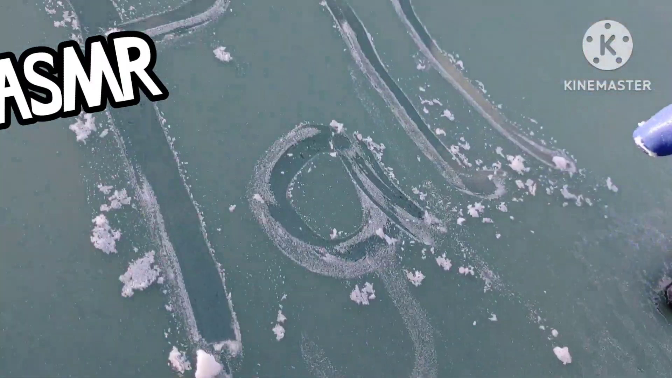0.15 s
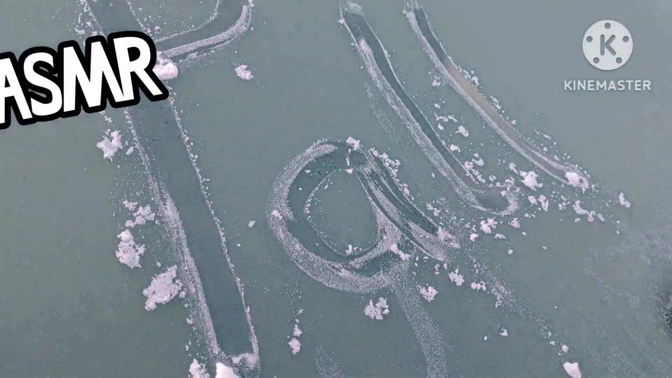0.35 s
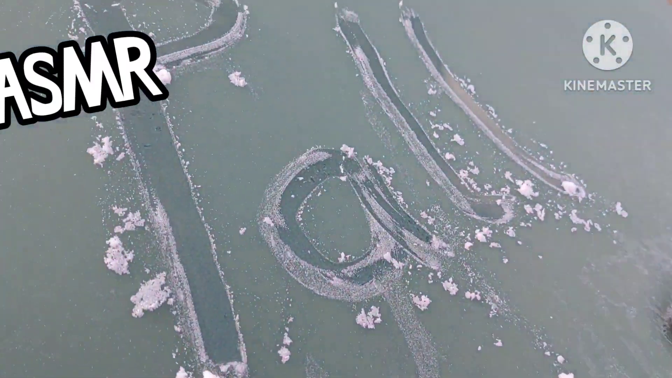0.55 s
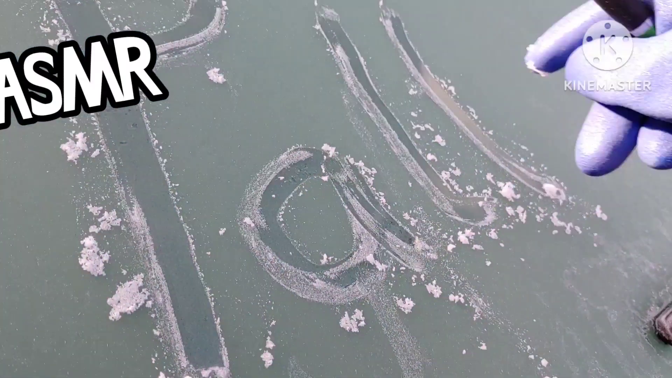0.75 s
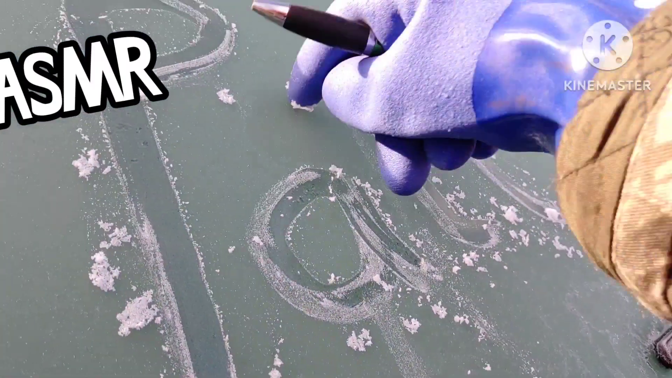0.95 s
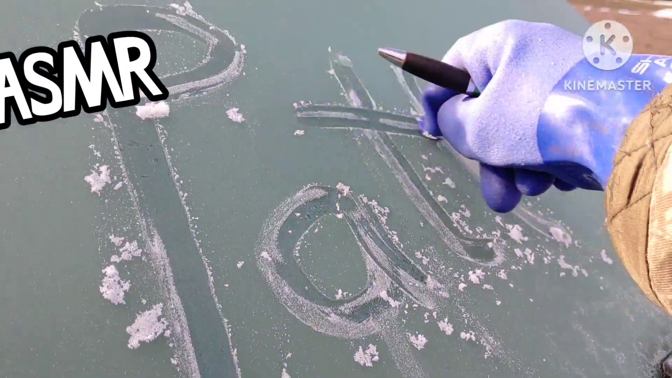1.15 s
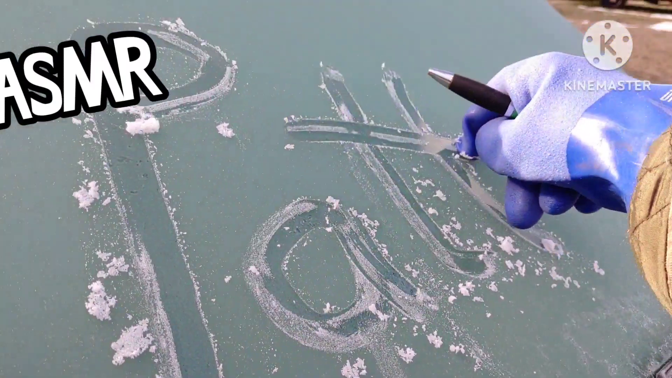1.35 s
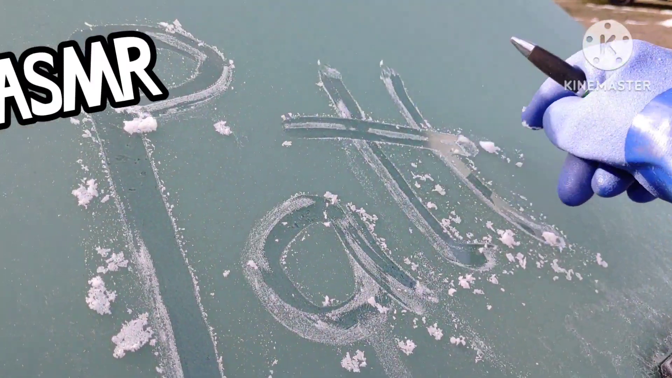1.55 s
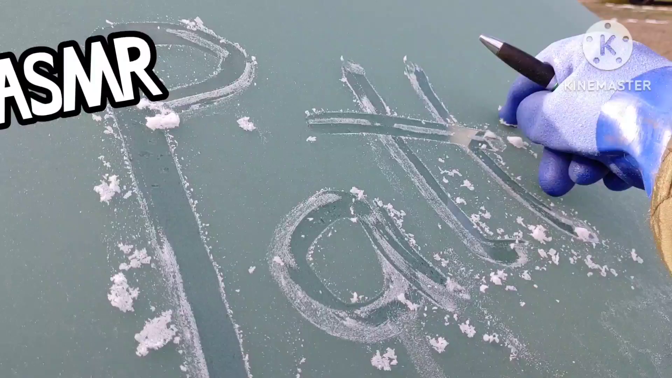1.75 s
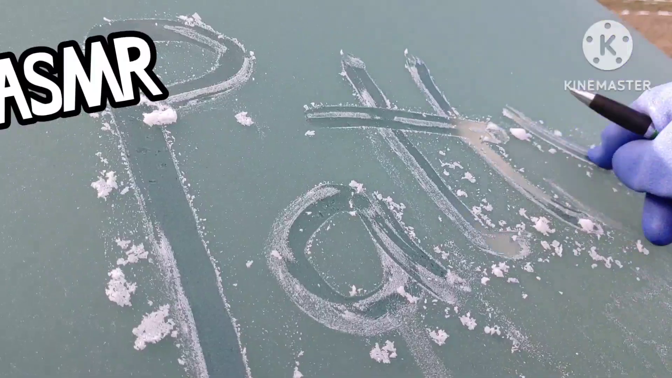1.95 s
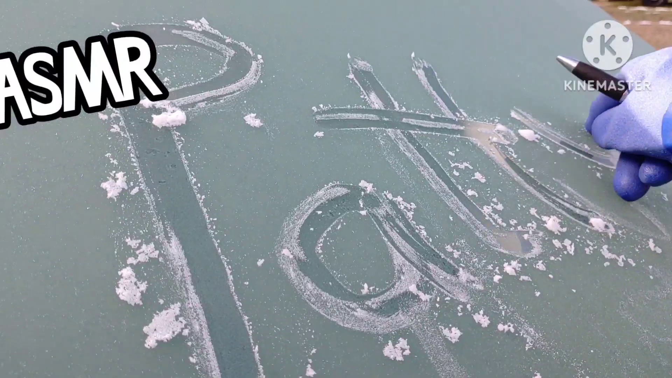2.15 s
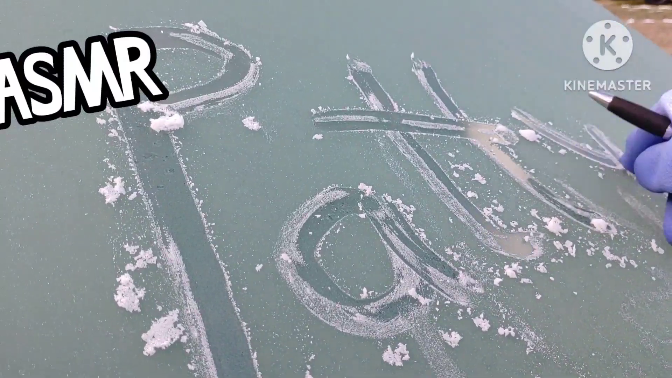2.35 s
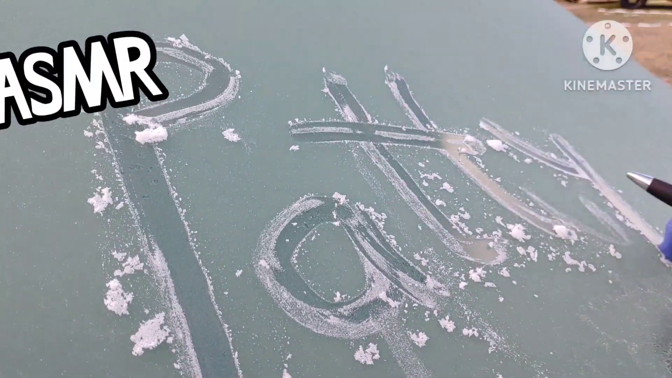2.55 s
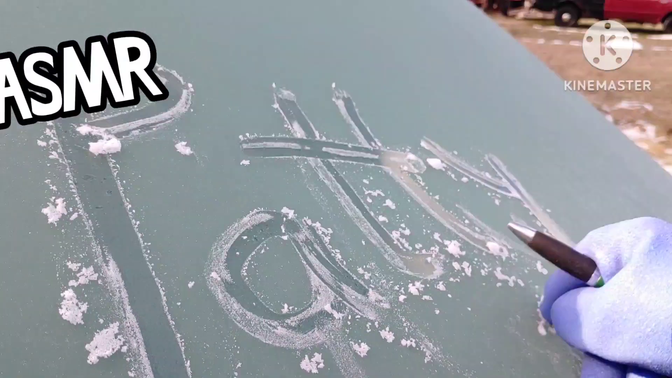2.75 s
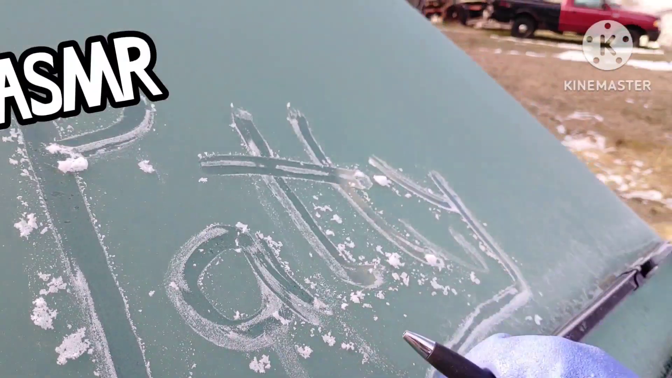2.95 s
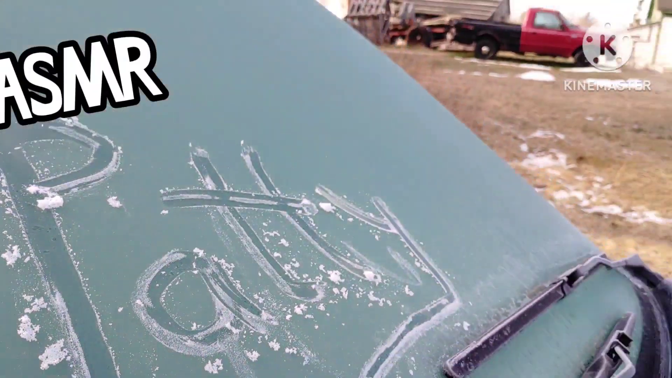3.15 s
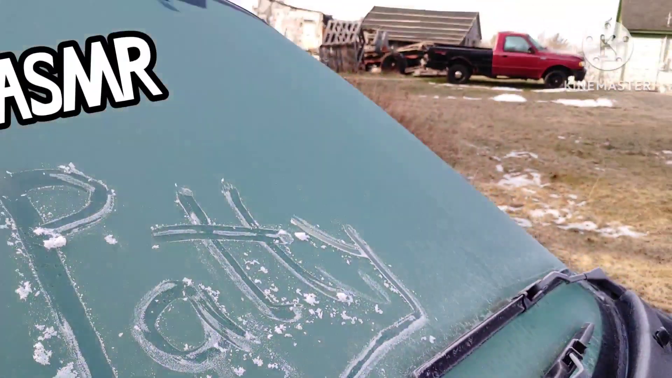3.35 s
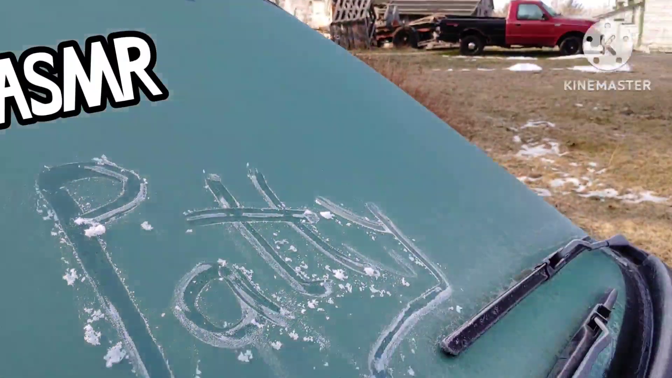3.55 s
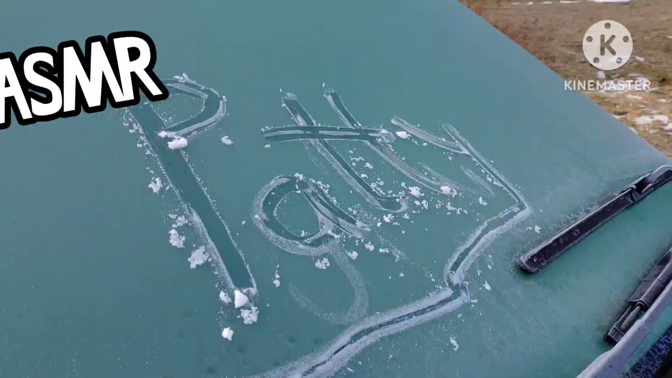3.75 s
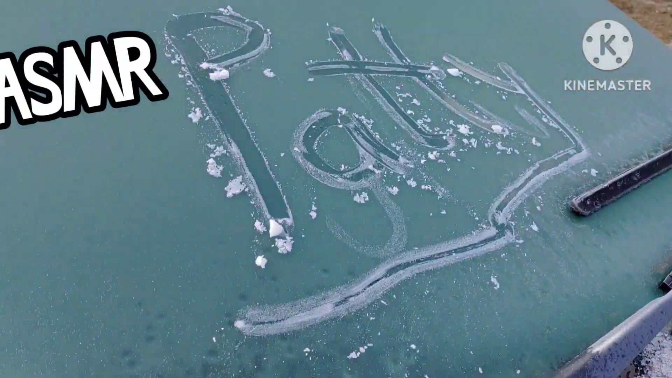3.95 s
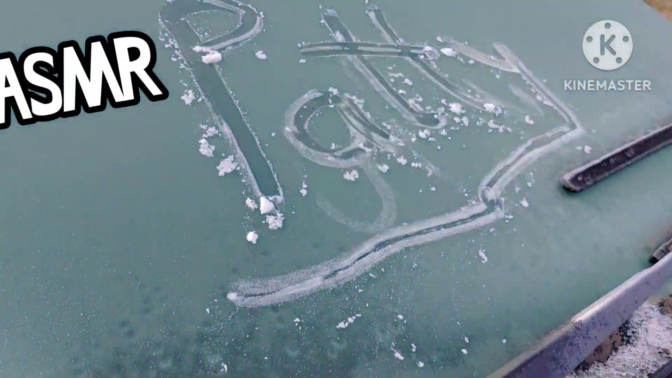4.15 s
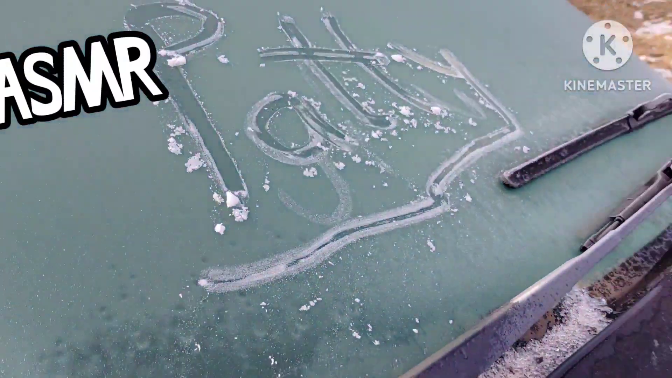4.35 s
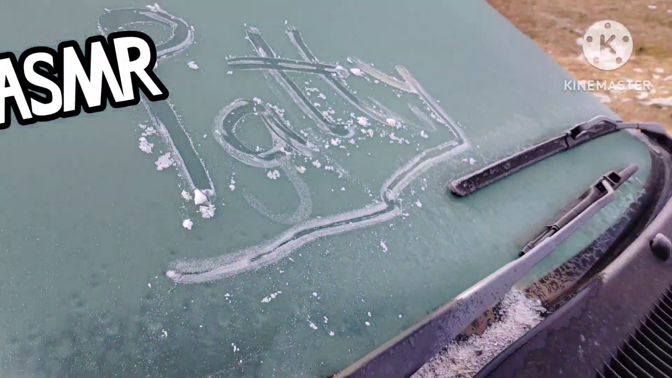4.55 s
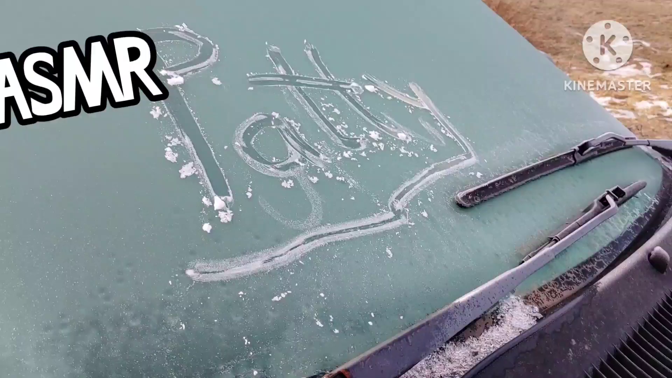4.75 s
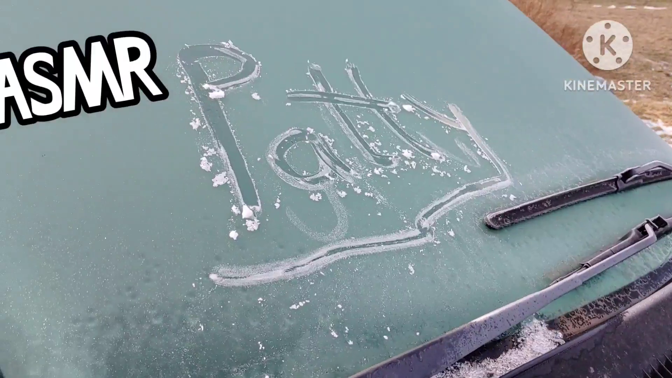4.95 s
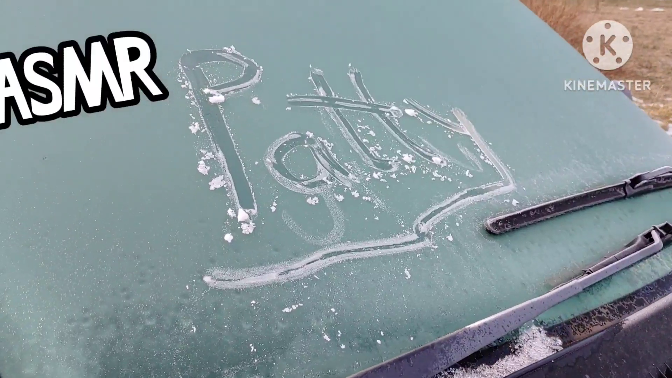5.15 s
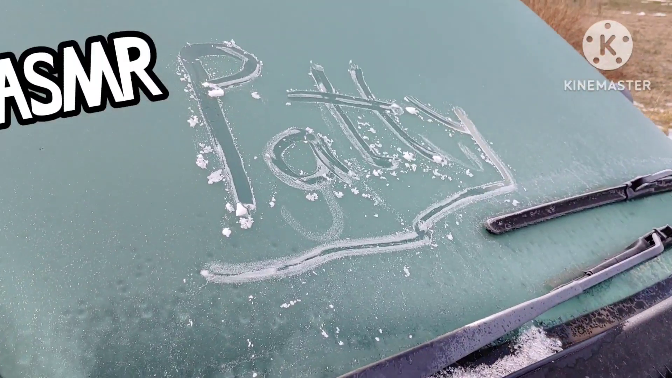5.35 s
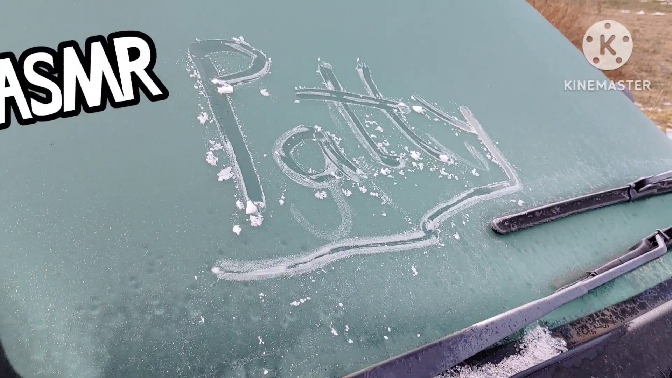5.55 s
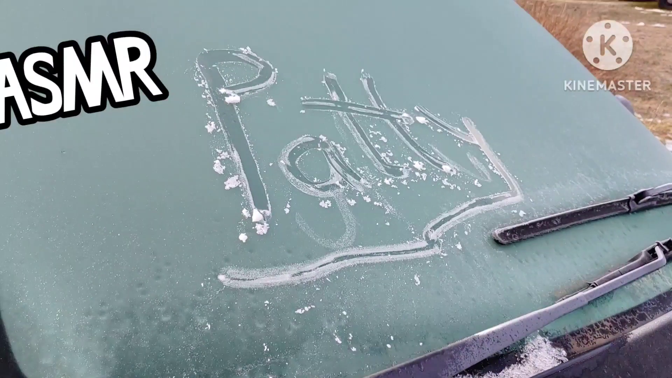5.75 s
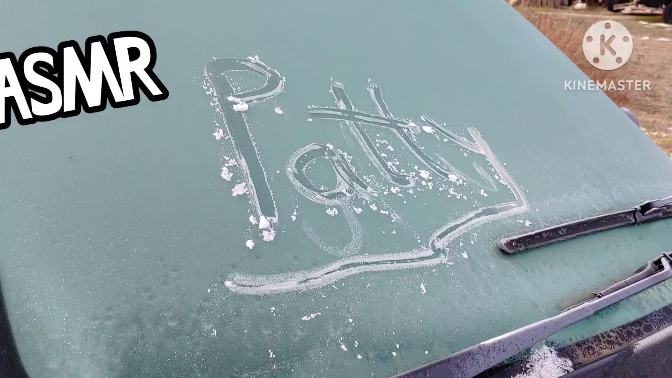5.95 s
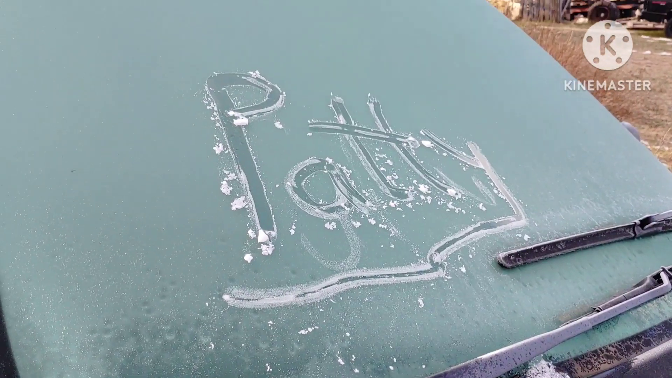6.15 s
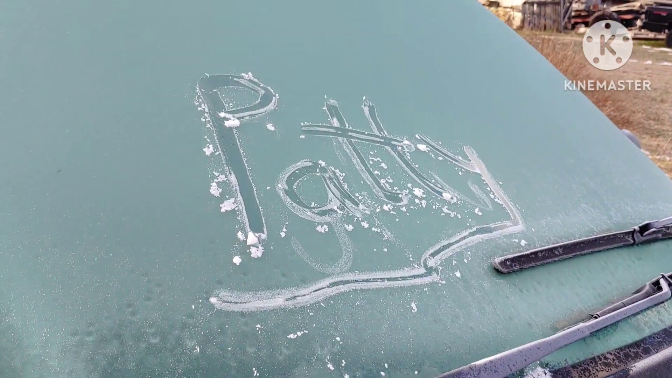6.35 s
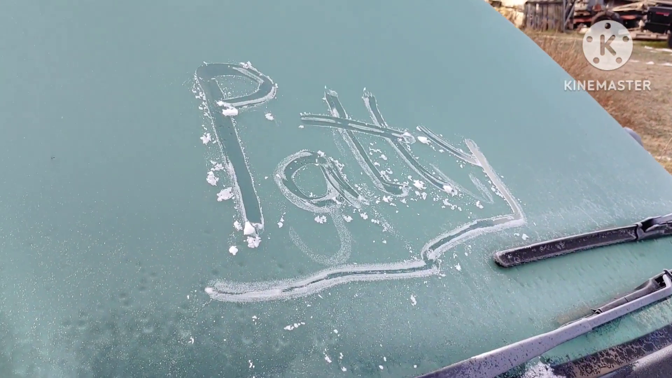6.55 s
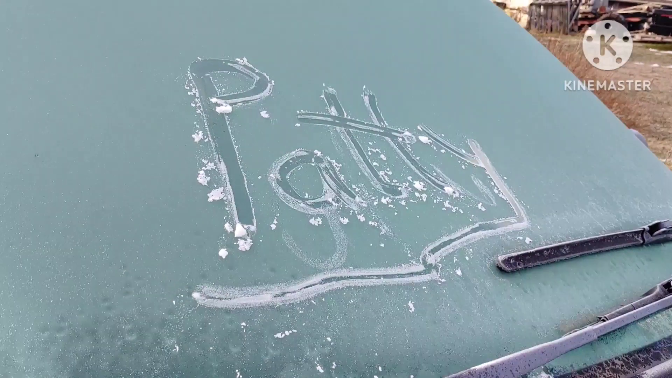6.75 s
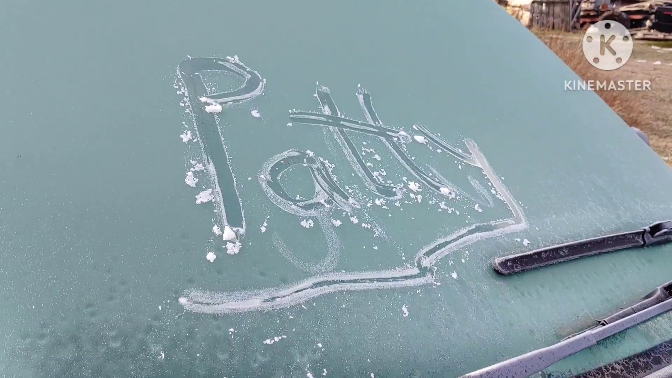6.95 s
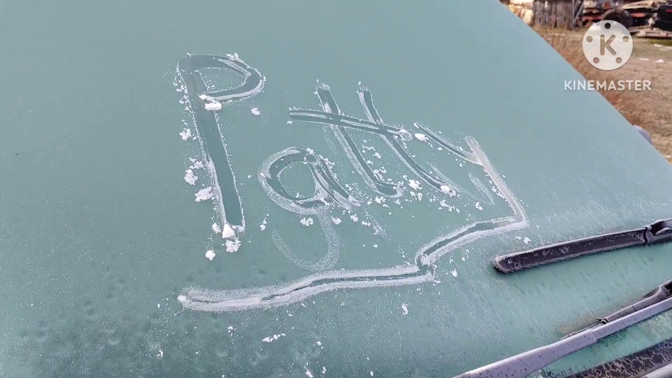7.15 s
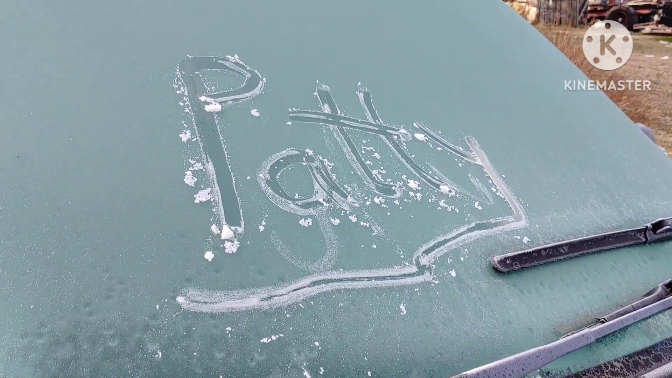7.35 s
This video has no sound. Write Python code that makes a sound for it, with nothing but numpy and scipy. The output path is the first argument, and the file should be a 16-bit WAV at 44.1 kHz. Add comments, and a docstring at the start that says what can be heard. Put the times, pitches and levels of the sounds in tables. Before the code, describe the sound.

A close, hand-held stereo phone outdoors, with faint microphone hiss and quiet distant air. From 0 to 0.9 seconds light wind buffets the microphones in low thumps, with soft handling bumps and small bright ticks. Around 0.9 to 1.1 a pen makes two short, crunchy scrapes through frost, with a slight glove squeak. Wind pops fill the gap around 1.35. From 1.65 to 3.35 quick overlapping strokes hiss and crackle, grainy and bright with a glassy ring, swelling and fading with the pen's speed, strongest near 2.6 to 3.3. A tiny scratch comes at 3.7. Sleeve cloth rustles softly; small pen clicks sound at 4.2 and 4.4, then a dense cluster of dull knocks and rubs on the phone around 4.6 to 4.75. Fainter knocks and a light click come near 5.1. Calm air with weak breeze follows, then muffled bumps around 6.6, ending quietly by about 7.4.

```python
"""Frost scraped from glass

A pen scrapes quick strokes through the frost on a windshield outdoors, close to a hand-held phone.
Dense random snaps, coloured by the frost and the glass, form the hiss of breaking ice crystals.
Low-frequency noise and brief pressure pulses form the light wind that buffets the two microphone ports.
Around and after the strokes a sleeve rustles (brushed grains) and the phone is bumped and rubbed
(blows and grains pass through its case); later the pen clicks (a cracked barrel rings)."""
import sys
import numpy as np
from scipy import signal
from scipy.fft import rfft, irfft
from scipy.io import wavfile
from scipy.ndimage import uniform_filter1d, map_coordinates

SR = 44100
rng = np.random.default_rng(int(sys.argv[2]) if len(sys.argv) > 2 else 0)


def pcm_store(signal):
    """Save signal as 16-bit PCM."""
    levels = np.round(np.clip(np.atleast_2d(signal), -1, 1) * 32767)
    wavfile.write(sys.argv[1], SR, levels.astype(np.int16).T)


N = 329762
TIME = np.arange(N) / SR

# All levels in the tables are relative: each source applies its own gain afterwards.
# Noise of the microphones: [f/Hz, level/dB]
HISS_SPECTRUM = [(1000, 0), (4000, -5.5), (6000, -5.5), (9000, -6.5), (10500, -3.5), (12500, 0.5),
                 (15500, -1)]
# Distant outdoor air: [f/Hz, level/dB]
AIR_SPECTRUM = [(20, 1), (70, -11.5), (200, -12), (400, -20), (800, -21), (1500, -32), (2300, -35),
                (3000, -37.5), (4500, -44.5), (6500, -49.5), (15500, -61)]
# Slow rise of the background level, strongest near 650 Hz: [t/s, level/dB]
BACKGROUND_RISE = [(0, -6), (3, 0), (6.6, 0.5), (7.4, 1)]
# Wind turbulence at a port: [f/Hz, level/dB]
BUFFET_SPECTRUM = [(12, -23.5), (30, -5), (60, 3.5), (120, -4), (200, -15), (350, -32), (700, -73.5),
                   (2000, -81.5)]
# Gusts: [middle t/s, half length t/s, left level/dB, right level/dB]
WIND_GUSTS = [(0.034, 0.2, -32.5, -38), (0.53, 0.23, -27.5, -31), (1.113, 0.07, -30.5, -29.5),
              (1.36, 0.031, -46, -18.5), (1.49, 0.28, -36, -65), (1.785, 0.1, -38, -18.5),
              (1.985, 0.1, -23, -26), (2.296, 0.29, -29.5, -28), (3.004, 0.21, -30.5, -42),
              (3.588, 0.27, -39.5, -45), (4.8, 0.16, -59, -58), (5.343, 0.26, -53, -43.5),
              (5.998, 0.19, -51, -52), (6.816, 0.17, -52, -49.5)]
CALM_DB = -66.5  # the breeze between gusts, on the scale of the gusts
# Strongest eddies that strike a port: [t/s, peak level/dB, pitch f/Hz, port from 0 left to 1 right]
WIND_EDDIES = [(0.136, -40, 132, 0.043), (0.357, -18.5, 83.4, 0), (0.455, -21, 101, 1),
               (0.534, -12, 132, 0.043), (0.764, -22, 120, 1), (1.355, -19, 112, 0.89),
               (1.384, -14.5, 116, 1), (1.579, -21, 136, 0.4), (1.66, -15.5, 85, 1), (1.777, -20, 108, 1),
               (1.801, -17, 140, 1), (1.848, -18.5, 104, 1), (1.903, -11, 87, 0.1),
               (1.943, -14.5, 126, 0.097), (2.607, -22, 108, 0.72), (3.043, -23.5, 100, 0),
               (3.784, -28, 63, 0.0073), (5.025, -37, 46.4, 1), (5.339, -23.5, 64.6, 1),
               (5.446, -29, 78, 1), (5.678, -23, 102, 1), (5.878, -28.5, 87, 1), (6.804, -33, 74, 1),
               (7.113, -41, 70, 0.94)]
# Brushed cloth: [f/Hz, level/dB]
CLOTH_SPECTRUM = [(150, 9.5), (350, 9), (900, 4), (1300, -3), (2000, -5), (3500, -11.5), (7000, -19),
                  (15500, -18.5)]
# Movements of the sleeve: [middle t/s, half length t/s, level/dB]
SLEEVE_SWELLS = [(0.9, 0.26, -57), (1.7, 0.13, -57), (2.08, 0.041, -54.5), (3.33, 0.31, -50),
                 (3.71, 0.033, -58), (4.2, 1, -64), (5.17, 0.18, -60)]
# Response of the phone's case: [f/Hz, level/dB]
CASE_RESPONSE = [(50, -35), (150, 6.5), (250, 0.5), (500, -0.5), (930, -1.5), (1200, -7.5), (2450, -9.5),
                 (2900, -24), (3300, -23), (3800, -23), (6500, -31.5), (15500, -32)]
# Resonances of the case: [f/Hz, width f/Hz, level/dB]
CASE_MODES = [(298, 25, 6.5), (636, 49, -4.5), (1930, 58, 3), (2280, 77, -8)]
# Dull, grainy rubs of the hand on the phone: [middle t/s, half length t/s, level/dB]
GRIP_RUBS = [(4.592, 0.0083, -42.5), (4.636, 0.023, -35), (4.72, 0.033, -42), (4.805, 0.04, -51)]
# Dull scuffing noise of the thumps and drags: [f/Hz, level/dB]
SCUFF_SPECTRUM = [(80, -2), (280, -3), (500, -8.5), (1000, -17), (2000, -30), (5000, -38.5)]
# Soft low thumps on the phone; those at 1.35 s and 1.38 s are wind overloading a port:
# [t/s, level/dB, scuff decay t/s, upper band edge f/Hz, pitch f/Hz]
SOFT_THUMPS = [(0.529, -17.5, 0.007, 800, 253), (0.546, -25, 0.0077, 600, 254),
               (0.561, -20.5, 0.0065, 796, 330), (0.572, -32, 0.0027, 800, 436),
               (0.757, -31.5, 0.0049, 495, 260), (1.349, -16.5, 0.0035, 600, 213),
               (1.382, -25, 0.0056, 400, 170), (6.582, -46, .004, 780, 330),
               (6.600, -38.5, 0.015, 1400, 340), (6.618, -30.5, 0.0054, 3500, 172),
               (6.665, -32, 0.019, 3000, 260), (6.677, -38.5, 0.021, 1800, 276)]
# The palm drags on the case: [middle t/s, half length t/s, level/dB]
PALM_DRAGS = [(6.65, 0.052, -51.5)]
# Hard knocks of the fingers: [t/s, peak level/dB, rattle decay t/s, upper band edge f/Hz, ring f/Hz]
FINGER_KNOCKS = [(0.837, -35, 0.0084, 1000, 318), (1.571, -30, 0.03, 700, 250),
                 (4.161, -47.5, 0.0024, 900, 696), (4.227, -44.5, 0.023, 1720, 398),
                 (4.429, -41, 0.024, 1850, 400), (4.611, -33.5, 0.0068, 4500, 860),
                 (4.621, -30, .003, 2600, 800), (4.631, -30, 0.0032, 1500, 503),
                 (4.641, -30.5, 0.0035, 2800, 600), (4.652, -28.5, 0.0024, 2800, 600),
                 (4.675, -33, .002, 3200, 1700), (4.693, -34.5, 0.0036, 3000, 900),
                 (4.722, -31, 0.017, 1400, 500), (4.759, -29, 0.0043, 930, 666),
                 (4.864, -43, 0.006, 2800, 1800), (5.084, -40.5, 0.023, 3000, 610),
                 (5.093, -34.5, 0.0024, 3400, 1300), (5.129, -34.5, 0.0064, 1700, 804),
                 (5.755, -51.5, 0.0022, 1500, 900)]
# Squeaks of the rubber glove and the pen: [middle t/s, half length t/s, level/dB, pitch f/Hz, width f/Hz]
SQUEAK_EVENTS = [(0.581, 0.0068, -56, 1860, 300), (0.889, 0.03, -54.5, 2000, 200),
                 (0.897, 0.024, -62, 3000, 660), (0.999, 0.048, -47.5, 2970, 410),
                 (4.637, 0.016, -62, 4020, 510), (5.248, 0.0043, -58, 1850, 180),
                 (5.242, 0.032, -65.5, 1845, 180), (5.263, 0.014, -53.5, 337, 8),
                 (5.51, 0.11, -77, 1860, 200)]
# Clicks of the pen's plastic barrel: [t/s, level/dB, decay t/s]
CLICK_EVENTS = [(4.226, -38, .004), (4.436, -28, 0.0028), (4.453, -48, 0.007), (4.483, -46, 0.0082),
                (5.05, -47, 0.0039)]
# Resonances of the barrel: [f/Hz, width f/Hz, level/dB]
BARREL_MODES = [(1470, 540, 3.5), (2050, 200, -23), (3270, 370, -1), (5000, 790, -1.5), (6680, 530, 1.5),
                (8800, 270, 2)]
# Small ticks of the pen and the glove: [t/s, peak level/dB, decay t/s, ring f/Hz]
TICK_EVENTS = [(0.021, -39, 0.0083, 5960), (0.493, -35, 0.0026, 1870), (0.494, -42, 0.003, 6700),
               (0.506, -32.5, 0.012, 1590), (0.512, -40, 0.0059, 6670), (0.55, -53, .003, 6520),
               (0.565, -56, .0015, 6500), (0.574, -44.5, 0.0018, 6600), (0.581, -41, 0.0063, 6060),
               (0.683, -53, 0.0015, 6700), (0.719, -49, 0.005, 6000), (0.735, -44, 0.0048, 5960),
               (0.749, -42, 0.0051, 6040), (0.76, -42.5, 0.0046, 5970), (0.771, -49, 0.0033, 6150),
               (0.787, -51, 0.0022, 6050), (0.833, -50, 0.0065, 6300), (0.854, -49, 0.016, 6130),
               (0.881, -50, 0.0055, 6700), (1.267, -37, 0.0062, 1740), (1.567, -38.5, 0.021, 1930),
               (1.587, -47.5, 0.0087, 6730), (1.663, -41, 0.011, 2400), (3.776, -51, 0.0048, 6400),
               (3.897, -49.5, 0.065, 2330), (4.31, -58, .002, 6800), (4.374, -51, .002, 7800),
               (4.408, -48, 0.0024, 7430), (5.053, -41.5, 0.0037, 2540)]
# Trickles of loose ice crumbs: [middle t/s, half length t/s, level/dB]
CRUMB_TRICKLES = [(0.16, 0.034, -79), (0.62, 0.1, -82), (4.35, 0.1, -76)]
# Strokes of the pen, treble and ring as they are at full speed: [start t/s, length t/s, speeding up t/s,
# slowing down t/s, level/dB, treble level/dB, ring of the glass f/Hz, ring level/dB]
PEN_STROKES = [ (0.896, 0.22, 0.02, 0.027, -40, -13.5, 3120, -4),
               (0.989, 0.06, 0.026, 0.026, -41, -13, 3030, 1),
               (1.648, 0.3, 0.095, 0.17, -40, -6, 2320, 5.5), (1.868, 0.2, 0.1, 0.051, -40, -8, 3020, 2.5),
               (2.095, 0.14, 0.081, 0.062, -43.5, -2.5, 2600, -4),
               (2.123, 0.63, 0.096, 0.082, -41.5, -12, 2240, 0.5),
               (2.42, 0.19, 0.089, 0.08, -37.5, -5.5, 2320, 1),
               (2.53, .29, 0.23, 0.066, -35, -4, 3330, 5.5), (2.777, 0.12, .04, 0.032, -45.5, -19, 1842, 1),
               (2.849, 0.19, 0.083, 0.083, -32.5, -9.5, 2900, -1.5),
               (2.966, 0.18, 0.12, 0.05, -37, -8.5, 2600, 3.5),
               (3.186, 0.136, 0.033, 0.093, -36, -7.5, 2500, 4),
               (3.322, 0.044, 0.021, 0.036, -39.5, -14, 1820, 5),
               (3.676, 0.027, 0.012, 0.014, -37, -11.5, 2100, -4), ]
SLOW_DULL_DB, SLOW_SAG_HZ = -14.5, 303  # a tip at rest against full speed: less treble, lower ring
# The scraped frost: [f/Hz, level/dB]
FROST_SPECTRUM = [(90, -14), (250, 12.5), (400, 2.5), (650, -1), (1050, 0), (1500, 2), (3000, -1.5),
                  (3900, -5.5), (5000, -7), (6000, -7.5), (7500, -8), (9500, -8.5), (15500, -12)]
# The pen's place: [t/s, lead of the left port t/ms, left minus right level/dB, low body of the glass level/dB,
# centre of a moving dip in the scrape's lower tone f/Hz, rasp of the frost level/dB]
PEN_PLACES = [(.9, 0.074, 8, -4, 1250, 0), (1.1, -0.018, 2.5, -0.5, 1300, 0),
              (1.7, -0.1, 2.5, 0.5, 1700, 2), (2.4, -0.16, 1.5, 4, 1200, 1), (2.92, 0.0059, 1, -3, 750, 0),
              (3.3, 0.14, 2.5, -3.5, 850, -0.5)]
DIP_ABOVE_RING_HZ = 360  # a freely chosen dip in the scrape's tone, this far above its ring
# Resonances and dips of each sound duct: [f/Hz, half width f/Hz, level/dB]
LEFT_DUCT = [(2490, 360, 5), (6635, 433, 12.5), (7700, 320, -5.5)]
RIGHT_DUCT = [(6150, 2100, -2.5), (7250, 250, 6), (8600, 340, 3)]
# Colour of both microphones: [f/Hz, level/dB]
MIC_RESPONSE = [(9500, 0.5), (10500, -6), (11300, -7), (12200, 4), (15500, 2.5)]
# Everything dips briefly: [from t/s, to t/s]
DIP_SPAN = (6.112, 6.136)
EDGE_HZ = 15750  # upper band limit


def amp(db):
    """Level definition: twenty decibels are a factor of ten in amplitude."""
    return 10 ** (np.asarray(db) / 20)


def unit(x):
    """Normalization: the signal is scaled to rms 1."""
    return x / np.sqrt(np.mean(x ** 2) + 1e-20)


def peaked(x):
    """Normalization: the signal is scaled to a peak of 1."""
    return x / (np.abs(x).max() + 1e-20)


def colour(x, points, size=4096):
    """Minimum-phase filtering by (f/Hz, level/dB) points: a folded cepstrum keeps attacks sharp."""
    hz, db = np.transpose(points)
    log_bins = np.log(np.fft.rfftfreq(size, 1 / SR) + 1)
    cepstrum = irfft(np.log(amp(np.interp(log_bins, np.log(hz), db))))
    cepstrum[1:size // 2] *= 2
    cepstrum[size // 2 + 1:] = 0
    taps = np.array(irfft(np.exp(rfft(cepstrum))), ndmin=x.ndim)
    return signal.oaconvolve(x, taps, axes=-1)[..., :N]


def band(x, lo_hz, hi_hz, order=1):
    """Band-pass filtering with gentle slopes."""
    edges = np.clip([lo_hz, hi_hz], 1, SR / 2 - 1)
    return signal.sosfilt(signal.butter(order, edges, "band", fs=SR, output="sos"), x)


def ring(x, hz, width_hz):
    """Resonance: one mode of gain 1 at its centre."""
    return signal.lfilter(*signal.iirpeak(hz, hz / width_hz, fs=SR), x)


def hill(hz, centre_hz, width_hz):
    """Resonance curve: a bell over frequency, of height 1."""
    return 1 / (1 + ((hz - centre_hz) / width_hz) ** 2)


def shade(x, field_db):
    """Time-varying filtering: field_db(t/s, f/Hz) gives the gain in dB."""
    hz, t, z = signal.stft(x, SR, nperseg=512)
    shaded = z * amp(field_db(t[None], hz[:, None]))
    return signal.istft(shaded, SR, nperseg=512)[1][..., :N]


def patches(t, hz, size):
    """Random texture of rms 1: noise smoothed over steps of 86 Hz and of 6 ms."""
    texture = rng.standard_normal((hz.size, t.size))
    texture = uniform_filter1d(texture, size=size[0], axis=0)
    return unit(uniform_filter1d(texture, size=size[1], axis=1))


def drift(rate_hz):
    """Random modulation: a wander of rms 1, up to the given rate."""
    steps = rng.standard_normal(N // 20)
    return unit(np.interp(2 * rate_hz * TIME, np.arange(len(steps)), steps))


def swells(rows):
    """Power addition of bell-shaped swells (middle t/s, half length t/s, level/dB), as a gain."""
    return np.sqrt(sum(amp(db) ** 2 * np.exp(-((TIME - s) / half) ** 2) for s, half, db in rows))


def grains(per_s, spread_db):
    """Shot noise: random clicks of uneven size in three streams, shared, left only and right only."""
    size = amp(spread_db * np.minimum(rng.exponential(1, (3, N)), 4))
    sign = rng.choice([-1, 1], (3, N))
    return unit(size * sign * (rng.random((3, N)) < per_s / SR))


def ports(streams, apart_db):
    """Partial coherence: each port hears a shared stream and one of its own."""
    return unit(streams[0] + amp(apart_db) * streams[1:])


def burst(noise, s, length, rise_s):
    """Transient envelope: stereo noise swells quickly and decays exponentially."""
    t = TIME[:SR // 6]
    piece = unit(noise[:, round(s * SR):][:, :len(t)])
    return piece * np.exp(-t / length) * (1 - np.exp(-t / rise_s)) ** 2


def delay(x, ms):
    """Propagation delay by a moving time, interpolated between samples."""
    return map_coordinates(x, [np.arange(N) - ms * SR / 1000], order=3)


def add(mix, s, sound):
    """Superposition: a stereo sound is summed into the mix at a time."""
    part = mix[:, max(0, round(s * SR)):][:, :sound.shape[1]]
    part += sound[:, :part.shape[1]]


def duct(x, hills):
    """Duct resonance: peaks and dips colour what reaches one microphone."""
    response = [(f, sum(db * hill(f, hz, width) for hz, width, db in hills))
                for f in np.linspace(1, SR / 2, 200)]
    return colour(x, response)


def case(x):
    """Modal response of the phone's case to a force: a dull body with a few firm rings."""
    rings = sum(amp(db) * ring(x, hz, width) for hz, width, db in CASE_MODES)
    return colour(x + rings, CASE_RESPONSE)


def hiss(gain_db=-76.5):
    """Incoherent self-noise: the microphones hiss steadily, unrelated at the two ports."""
    return amp(gain_db) * unit(colour(rng.standard_normal((2, N)), HISS_SPECTRUM))


def air(gain_db=-61, shared_gain=0.86, swell_db=-0.22):
    """Coherence of ambient noise: the quiet outdoor air is more alike at the two ports in the bass."""
    left, right, common = rng.standard_normal((3, N))
    noise = np.array([left, right]) + shared_gain * band(common, lo_hz=58.4, hi_hz=1480)

    def background_rise(t, hz):
        """Slow rise of the background level, strongest near 650 Hz."""
        return np.interp(t, *np.transpose(BACKGROUND_RISE)) * hill(hz, centre_hz=650, width_hz=800)

    noise = shade(unit(colour(noise, AIR_SPECTRUM)), background_rise)
    return amp(gain_db + swell_db * drift(rate_hz=0.41)) * noise


def wind(gain_db=-2, lump_db=5.5, eddy_db=2.5, crest=5.7):
    """Turbulent pressure: gusts swell over a breeze; an eddy is a brief suction between two pushes."""
    s, half, *ports_db = np.transpose(WIND_GUSTS)
    force = np.array([np.hypot(swells(zip(s, half, db)), amp(CALM_DB)) for db in ports_db])
    lumps = []
    for _ in ports_db:
        turbulence = colour(rng.standard_normal(N), BUFFET_SPECTRUM)
        lumps.append(unit(turbulence * amp(lump_db * drift(rate_hz=20.0))))
    out = crest * np.tanh(np.array(lumps) / crest) * force * amp(gain_db)  # soft limit on the lumps
    t = TIME[:SR // 10] - TIME[SR // 20]
    for s, db, hz, port in WIND_EDDIES:
        u = (np.pi * hz * t) ** 2
        right = np.clip(port, 0, 1)
        pulse = amp(db + eddy_db) * (2 * u - 1) * np.exp(-u)
        add(out, s + t[0], np.outer([1 - right, right], pulse))
    return out


def sleeve(gain_db=1, flutter_db=2.0):
    """Friction of cloth: fibres of the jacket brush over each other in dense grains."""
    fibres = ports(colour(grains(per_s=6600, spread_db=1), CLOTH_SPECTRUM), apart_db=10.0)
    return fibres * swells(SLEEVE_SWELLS) * amp(gain_db + flutter_db * drift(rate_hz=36))


def grip(gain_db=-2):
    """Stick-slip friction: the hand slips in uneven grains, heard through the phone's case."""
    slips = grains(per_s=2600, spread_db=2.5) * amp(1.8 * drift(rate_hz=130))
    return ports(case(slips), apart_db=1) * swells(GRIP_RUBS) * amp(gain_db)


def thumps(gain_db=0, decay_cycles=1.0, scuff_db=-12, hum_hz=290):
    """Damped oscillation: a thump is a brief low swing with a scuff; a dragging palm makes the case hum."""
    scuff = ports(colour(grains(per_s=9000, spread_db=-0.5), SCUFF_SPECTRUM), apart_db=-2)
    out = unit(ring(scuff, hum_hz, width_hz=98)) * swells(PALM_DRAGS)
    for s, db, length, dull_hz, hz in SOFT_THUMPS:
        slide = amp(scuff_db) * burst(scuff, s, length, rise_s=0.00046)
        turns = hz * TIME[:slide.shape[1]]
        swing = np.sin(2 * np.pi * turns) * np.exp(-turns / decay_cycles)
        add(out, s, amp(db + gain_db) * band(swing + slide, lo_hz=60, hi_hz=dull_hz, order=2))
    return out


def knocks(gain_db=0, rattle_db=-17, ring_db=3, width_hz=260):
    """Impulse response: a sharp blow and a rattle ring the case according to where it is struck."""
    out = np.zeros((2, N))
    grit = ports(grains(per_s=4000, spread_db=1.5), apart_db=-1.5)
    for s, db, length, dull_hz, hz in FINGER_KNOCKS:
        rattle = amp(rattle_db) * burst(grit, s, length, rise_s=0.0011)
        blow = case(rattle + signal.unit_impulse(rattle.shape[1]))
        blow = blow + amp(ring_db) * ring(blow, hz, width_hz)
        blow = band(blow, lo_hz=90, hi_hz=dull_hz, order=2)
        add(out, s, amp(db + gain_db) * peaked(blow))
    return out


def squeaks(gain_db=0):
    """Friction tones: brief slips sing in a narrow band, as noise through two equal resonances."""
    out = np.zeros((2, N))
    t = TIME[:SR] - TIME[SR // 2]
    for s, half, db, hz, width in SQUEAK_EVENTS:
        slips = ports(rng.standard_normal((3, SR)), apart_db=-3.5)
        tone = ring(ring(slips, hz, width), hz, width)
        bell = np.exp(-(t / half) ** 2 / 2)
        squeak = unit(tone * bell) * np.sqrt(np.mean(bell ** 2))  # a short bell keeps its small energy
        add(out, s + t[0], amp(db + gain_db) * squeak)
    return out


def clicks(gain_db=0, crack_db=-15):
    """Modal excitation: a hard crack rings the barrel of the pen."""
    crack = ports(grains(per_s=9900, spread_db=-1.0), apart_db=6.5)
    modes = sum(amp(db) * ring(crack, hz, width) for hz, width, db in BARREL_MODES)
    barrel = unit(amp(crack_db) * crack + modes)
    out = np.zeros((2, N))
    for s, db, length in CLICK_EVENTS:
        add(out, s, amp(db + gain_db) * burst(barrel, s, length, rise_s=0.0012))
    return out


def ticks(gain_db=0, ring_db=20, width_hz=520):
    """Transient resonance: each tick is a short spill of tiny snaps with one broad ring."""
    out = np.zeros((2, N))
    snaps = band(ports(grains(per_s=6900, spread_db=6), apart_db=16), lo_hz=774, hi_hz=9400)
    for s, db, length, hz in TICK_EVENTS:
        spill = burst(snaps, s, length, rise_s=0.0007)
        tick = spill + amp(ring_db) * ring(spill, hz, width_hz)
        add(out, s, amp(db + gain_db) * peaked(tick))
    return out


def crumbs(gain_db=0):
    """Random impacts: bits of ice drop on the glass, a few dozen a second, each a tiny bright click."""
    t = TIME[:SR // 50]
    click = rng.standard_normal(len(t)) * np.exp(-t / 0.0024)
    impacts = ports(grains(per_s=35, spread_db=-1.5), apart_db=2)
    drops = signal.oaconvolve(impacts, click[None], axes=1)[:, :N]
    return unit(band(drops, lo_hz=5100, hi_hz=12900)) * swells(CRUMB_TRICKLES) * amp(gain_db)


def stroking(t):
    """Kinematics of a stroke: gain, treble/dB and ring (f/Hz, level/dB) follow the speed of the tip."""
    start, length, rise, release, db, treble_db, ring_hz, ring_db = np.transpose(PEN_STROKES)
    age = t[..., None] - start
    ramp = np.clip(np.minimum(age / rise, (length - age) / release), 0, 1)
    speed = np.sin(np.pi / 2 * ramp)
    power = (amp(db) * speed) ** 2 + 1e-20
    slowness = 1 - speed
    tone = (treble_db + SLOW_DULL_DB * slowness, ring_hz - SLOW_SAG_HZ * slowness, ring_db)
    total = power.sum(-1)
    # overlapping strokes share their tone in proportion to power
    return np.sqrt(total), *((value * power).sum(-1) / total for value in tone)


def pen(gain_db=-1, chatter_db=-0.26, glass_db=-1, treble_db=8, width_hz=300, dip_depth=0.45,
        low_dip_db=4, patchy_db=2.0, crunch_db=2.0):
    """Fracture noise: the tip catches, slips and snaps thousands of crystals a second; the glass spreads it."""
    place_s, lead_ms, pan_db, body_db, low_dip_hz, rasp_db = np.transpose(PEN_PLACES)

    def glass(t, hz):
        """Speed brightens the sound, ring and dips move, and the frost breaks in uneven flakes."""
        _, bright_db, ring_hz, ring_db = stroking(t)
        spray = (bright_db + treble_db) * hz ** 4 / (hz ** 4 + 6500. ** 4)  # treble shelf
        body = np.interp(t, place_s, body_db) / (1 + (hz / 900) ** 4)  # bass shelf
        dip = dip_depth * hill(hz, ring_hz + DIP_ABOVE_RING_HZ, width_hz)
        ringing = ring_db * (hill(hz, ring_hz, width_hz) - dip)
        low_dip = low_dip_db * hill(hz, np.interp(t, place_s, low_dip_hz), width_hz)
        rasp = np.interp(t, place_s, rasp_db) * hill(hz, centre_hz=4030, width_hz=1100)
        # narrow lasting patches, then wide brief ones
        flakes = patchy_db * patches(t, hz, size=(3, 18)) + crunch_db * patches(t, hz, size=(24, 2))
        return spray + rasp + body + ringing - low_dip + flakes

    snaps = shade(unit(colour(grains(per_s=7500, spread_db=2.0), FROST_SPECTRUM)), glass)
    snaps = snaps * stroking(TIME)[0] * amp(gain_db + chatter_db * drift(rate_hz=90))
    direct = np.array([snaps[0], delay(snaps[0], np.interp(TIME, place_s, lead_ms))])
    heard = direct + amp(glass_db) * snaps[1:]
    return heard * amp(np.outer([.5, -.5], np.interp(TIME, place_s, pan_db)))


def scene():
    """Superposition at the two ports: ducts colour all sources but the wind and the self-noise."""
    surroundings = air() + sleeve()
    phone = grip() + thumps() + knocks()
    scraping = squeaks() + clicks() + ticks() + crumbs() + pen()
    left, right = surroundings + phone + scraping
    return np.array([duct(left, LEFT_DUCT), duct(right, RIGHT_DUCT)]) + wind() + hiss()


def record(dry):
    """Microphone colour, then the level dips briefly, then the band limit."""
    dipping = (TIME > DIP_SPAN[0]) & (TIME < DIP_SPAN[1])
    dip = uniform_filter1d(np.where(dipping, amp(-51.0), 1), size=150)
    edge = signal.firwin(511, EDGE_HZ, window=("kaiser", 9), fs=SR)
    return signal.oaconvolve(colour(dry, MIC_RESPONSE) * dip, edge[None], "same")


dry = scene()
out = record(dry)
pcm_store(out)
```